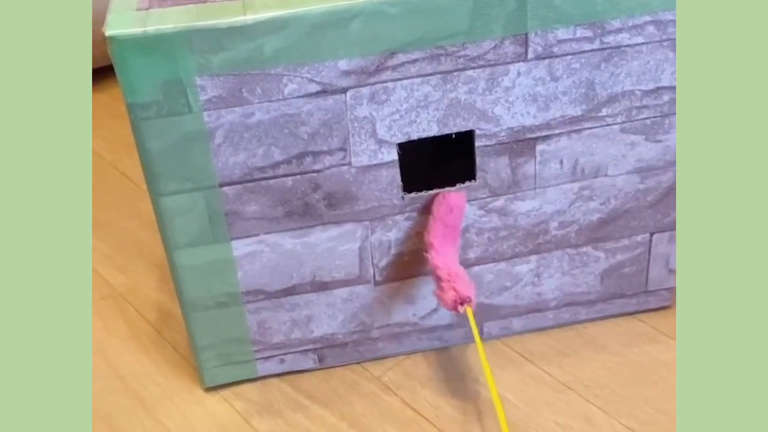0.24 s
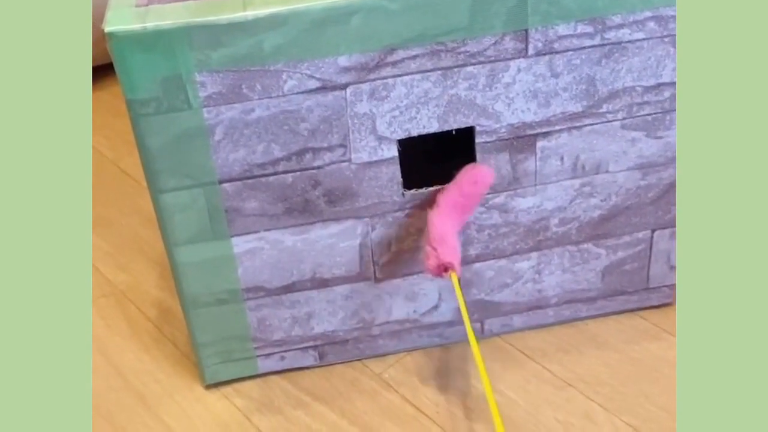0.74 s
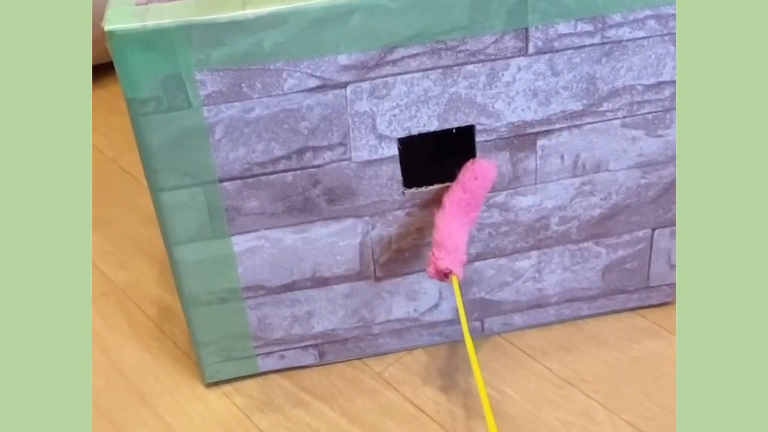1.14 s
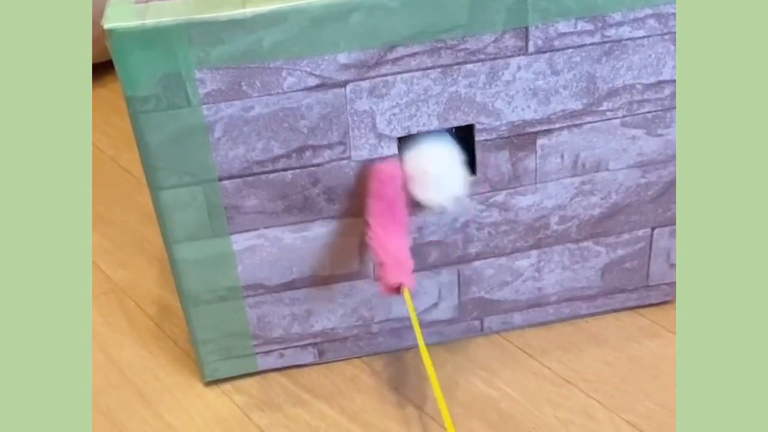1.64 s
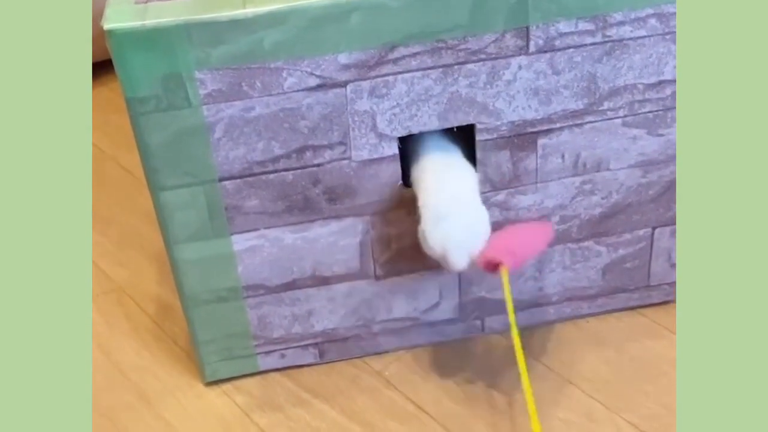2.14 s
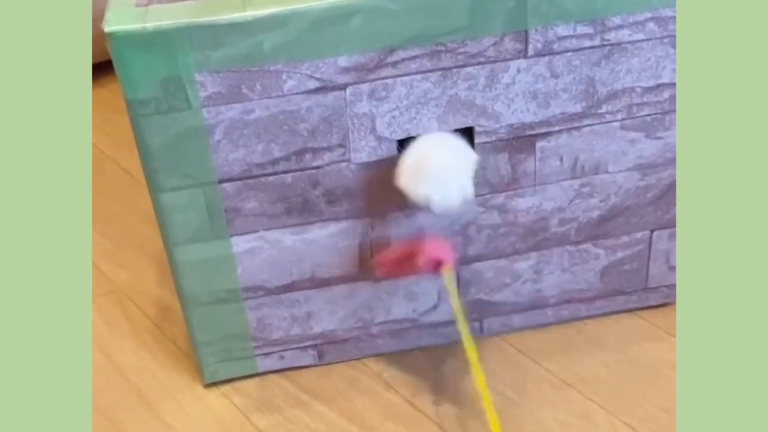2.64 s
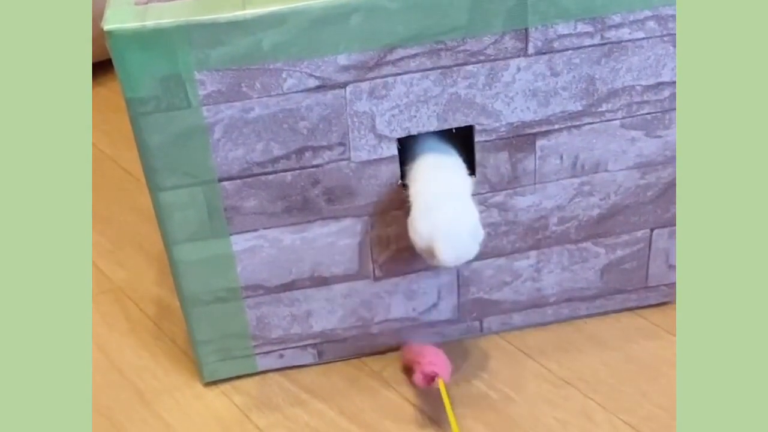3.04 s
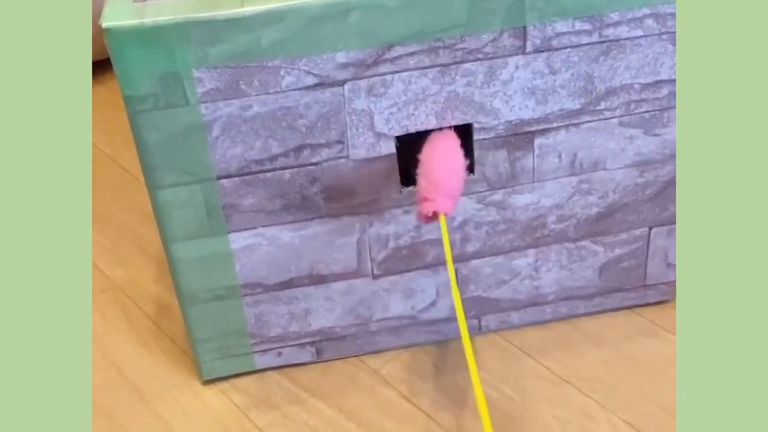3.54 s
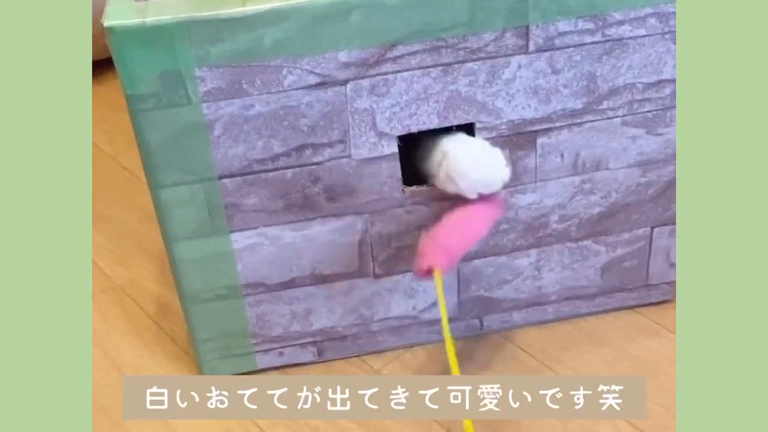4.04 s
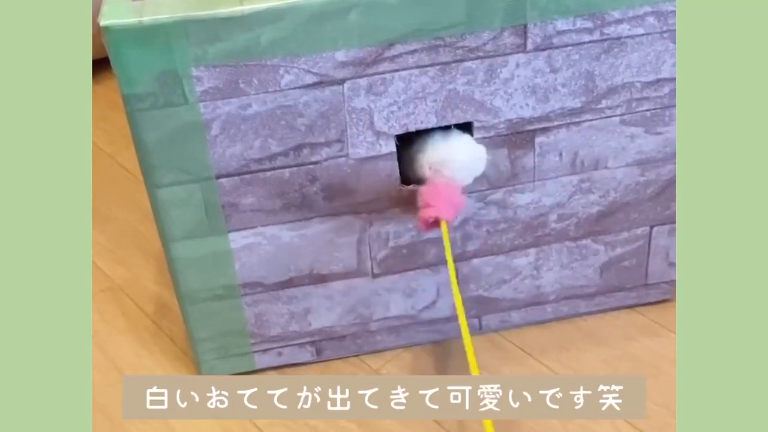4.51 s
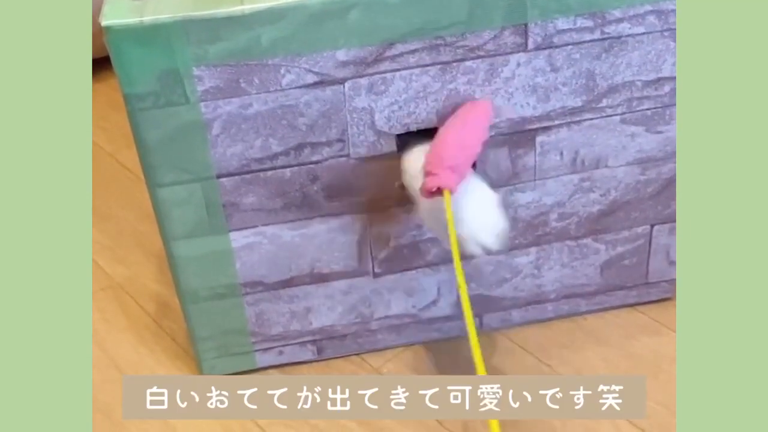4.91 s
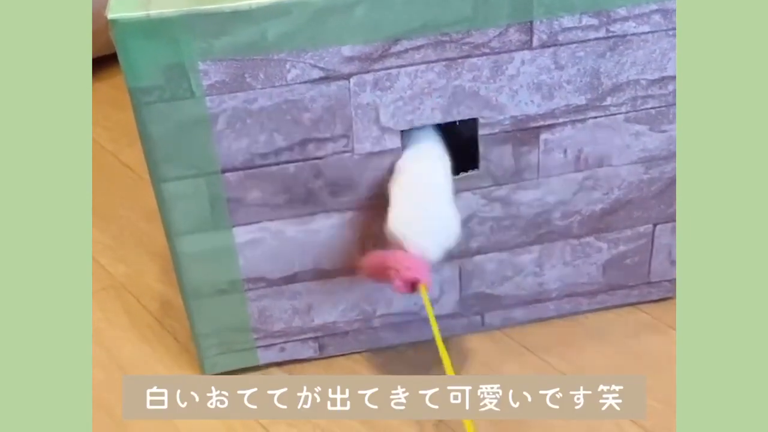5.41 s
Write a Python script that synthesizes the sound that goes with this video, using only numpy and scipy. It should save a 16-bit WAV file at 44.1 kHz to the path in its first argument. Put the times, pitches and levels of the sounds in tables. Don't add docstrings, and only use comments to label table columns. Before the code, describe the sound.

In a quiet room, a cat's paw thumps a hollow cardboard box in sudden bursts, with claw ticks, scrapes and short rasps over faint low hum.

```python
import sys
import numpy as np
from scipy import signal
from scipy.fft import rfft, irfft
from scipy.io import wavfile
from scipy.ndimage import uniform_filter1d

SR = 44100
rng = np.random.default_rng(int(sys.argv[2]) if len(sys.argv) > 2 else 0)


def makeup_ratio(level_db):
    decades = np.asarray(level_db, float) / 20
    return 10 ** decades


def digitize_waveform(pressure):
    field = np.atleast_2d(pressure).T
    bounded = np.clip(field, -1, 1)
    quanta = np.round(bounded * 32767).astype(np.int16)
    wavfile.write(sys.argv[1], SR, quanta)


N = 250047
HZ = np.arange(N // 2 + 1) * SR / N

# frequency in Hz, width in Hz, level in dB.
WALL_MODES = [(186, 32, -1.5), (281.5, 46.1, 0.5), (320, 37, 2), (346.7, 34, -1.5), (447, 19, -15),
              (163, 30, -14)]
# frequency in Hz, width in Hz, level in dB.
CAVITY_MODES = [(62.95, 13, -4), (82.6, 12, 4.5), (112, 46.3, -1)]
# frequency in Hz, width in Hz, level in dB.
BOARD_MODES = [(522, 160, 6.5), (790, 290, -6.5), (904, 43, 7), (1200, 350, 8.5), (1390, 71, 0),
               (1657, 220, -10.5), (1880, 320, -7), (2830, 460, -11.5)]


def unit(x):
    return x / np.sqrt(np.mean(x ** 2))


def colour(x, points):
    hz, db = np.transpose(points)
    gain_db = np.interp(np.log(HZ + 1), np.log(hz), db)
    return irfft(rfft(x) * makeup_ratio(gain_db), N)


def ring(x, modes):
    total = 0
    for k, (hz, width, db) in enumerate(modes):
        mode = signal.lfilter(*signal.iirpeak(hz, hz / width, SR), x)
        total = total + (-1) ** k * makeup_ratio(db) * mode
    return total


def walk(rate):
    k = int(SR / rate)
    held = np.repeat(rng.standard_normal(N // k + 1), k)
    return 1.6 * uniform_filter1d(uniform_filter1d(held, k), k)[:N]


def grains(rate, spread_db):
    when, sign, size = rng.random((3, N))
    size_db = spread_db * np.minimum(-np.log(1 - size), 4.6)
    return (when < rate / SR) * np.sign(sign - .5) * makeup_ratio(size_db)


def add(out, s, burst, db):
    i = int(s * SR)
    n = min(len(burst), N - i)
    out[i:i + n] += burst[:n] * makeup_ratio(db) / np.abs(burst).max()


def sag(hz, rise_s, t60_s, glide, glide_s):
    t = np.arange(SR // 4) / SR
    turns = hz * (t + glide * glide_s * (1 - np.exp(-t / glide_s)))
    rise = (1 - np.exp(-t / rise_s)) ** 2
    decay = np.exp(-np.log(1000) * t / t60_s)
    return -rise * decay * np.sin(2 * np.pi * turns)


def blows():
    # start in seconds, wall level in dB, wall pitch in Hz,
    # cavity level in dB, cavity pitch in Hz.
    paw_swats = [(1.542, -5.5, 260, -21.5, 120.4), (1.558, -15, 304, -28, 128),
                 (1.573, -18.5, 265, -37, 73.4), (1.602, -18, 183, -38, 116.5),
                 (1.643, -21.5, 189, -26, 92), (1.684, -25.5, 268, -41.5, 117),
                 (1.9418, -18, 210, -28, 114), (1.962, -18.5, 167.5, -20.5, 117.7),
                 (1.973, -24, 188, -24, 107.6), (1.986, -45, 171, -26, 98.4),
                 (2.016, -37, 167.5, -29.5, 58), (3.179, -23.5, 266, -31.5, 104),
                 (3.192, -40.5, 286, -41, 75.5), (3.305, -31.5, 326, -45, 116),
                 (4.006, -36.5, 229, -47, 69.3), (4.7265, -19, 278, -28, 101), (4.757, -18.5, 229, -48, 96),
                 (4.777, -13, 300.6, -31, 104.5), (4.841, -31, 287, -44, 109), (4.87, -31, 211, -38.5, 83),
                 (4.983, -14.5, 214.6, -26.5, 117), (5.072, -57, 168.6, -40, 100),
                 (5.407, -29, 203, -27.5, 83.6), (5.459, -25.5, 193, -34.5, 71.8)]
    # start in seconds, wall level in dB, cavity level in dB.
    light_bumps = [(1.658, -30.5, -35.5), (1.71, -32.5, -43), (2.098, -55, -44), (2.338, -43.5, -44.5),
                   (2.693, -50, -50), (2.865, -38, -65.5), (3.148, -46, -51), (3.339, -36.5, -72),
                   (3.505, -51.5, -53), (3.65, -51.5, -52), (2.472, -58, -57), (4.044, -42, -53.5),
                   (4.08, -50, -54), (4.119, -37, -45.5), (4.138, -37, -49), (4.192, -41, -46),
                   (4.542, -46.5, -72), (4.597, -61, -44), (4.822, -31.5, -44), (4.896, -33.5, -34),
                   (4.918, -36.5, -73), (5.017, -52, -37.5), (5.047, -51, -40), (5.108, -47, -39.5),
                   (5.154, -37, -48.5), (5.295, -45, -46), (5.316, -35, -61), (5.34, -40.5, -60),
                   (5.373, -55, -46), (5.493, -42.5, -47)]
    out, knock, shove = np.zeros((3, N))
    place = np.exp(0.17 * rng.standard_normal((len(light_bumps), 2)))
    bumps = [(s, wall_db, 241.7 * a, boom_db, 93.4 * b)
             for (s, wall_db, boom_db), (a, b) in zip(light_bumps, place)]
    for s, wall_db, wall_hz, boom_db, boom_hz in paw_swats + bumps:
        add(out, s + 0.0021, sag(wall_hz * 0.89, 0.003, 0.033, 0.18, 0.0068), wall_db - 3.0)
        add(out, s + 0.0056, sag(boom_hz, 0.0042, 0.12, 0.29, 0.0079), boom_db)
        add(knock, s, np.hanning(SR // 600), wall_db)
        add(shove, s + 0.007, np.hanning(SR // 150), boom_db)
    return out + makeup_ratio(2.5) * ring(knock, WALL_MODES) + makeup_ratio(10.5) * ring(shove, CAVITY_MODES)


def touches(rows, length, shape, firm, trim_db):
    # frequency in Hz, width in Hz, level in dB.
    crack_modes = [(1980, 250, 1.5), (2960, 640, -2)]
    out, t = np.zeros(N), np.arange(SR // 10) / SR
    body = signal.butter(3, [420, 1500], "band", fs=SR, output="sos")
    dull = signal.butter(3, 2200, fs=SR, output="sos")
    snap = signal.butter(2, [4200, 13500], "band", fs=SR, output="sos")
    noises = rng.standard_normal((len(rows), 3, len(t)))
    for (s, db, hz, crack_db, snap_db), noise in zip(rows, noises):
        touch = noise * shape(t / max(length, .0004))
        touch[0, SR // 1000] += firm * np.sqrt(np.sum(touch[0] ** 2))
        thud = ring(touch[0], [(hz, hz / 3, 0)]) + signal.sosfilt(body, touch[0]) / 2
        start, thud_db, bright_db = s - .001, db + trim_db[0], crack_db + trim_db[1]
        add(out, start, signal.sosfilt(dull, thud), thud_db)
        add(out, start, ring(ring(touch[1], crack_modes), crack_modes), bright_db)
        add(out, start, ring(touch[0], BOARD_MODES[:1]), thud_db - 10.0)
        add(out, start, ring(touch[2], [(3530, 2800, 0)]), bright_db - 9.5)
        add(out, start, signal.sosfilt(snap, touch[2]), snap_db + trim_db[2])
    return out


def ticks():
    # start in seconds, level in dB, board ring in Hz, crack in dB, treble snap in dB.
    claw_ticks = [(1.543, -16.5, 1290, -26, -66), (1.6, -27, 1410, -39, -43), (1.608, -26, 676, -62, -54.5),
                  (1.637, -28, 710, -42, -44.5), (1.648, -22, 670, -33, -44.5),
                  (1.685, -43, 1100, -47, -46), (1.704, -43, 746, -47, -75), (1.94, -30.5, 750, -76, -62),
                  (2.375, -58.5, 760, -77, -62.5), (2.864, -49.5, 1236, -60, -69),
                  (3.164, -50, 1302, -67, -83), (3.188, -52, 1055, -55, -59),
                  (3.31, -56.5, 696, -50.5, -58.5), (3.318, -42.5, 2110, -58, -65),
                  (3.427, -54.5, 1283, -60.5, -56.5), (4.115, -53.5, 1675, -60.5, -57),
                  (4.142, -53, 1012, -67.5, -72), (4.19, -51, 1806, -58, -58),
                  (4.757, -42.5, 850, -54, -49), (4.779, -37.5, 703, -49, -50.5),
                  (4.981, -43.5, 940, -53, -52.5), (5.043, -50, 1180, -49, -61),
                  (5.364, -46, 1140, -65, -77), (5.488, -49.5, 1228, -62, -56)]
    # start in seconds, level in dB, treble snap in dB.
    faint_tips = [(0.752, -77, -76), (1.88, -70.5, -58.5), (1.925, -51.5, -55.5), (1.959, -51, -55),
                  (2.108, -66, -60.5), (3.294, -62.5, -69), (3.453, -59, -65), (3.548, -63, -89),
                  (3.708, -64.5, -72), (4.078, -60, -77), (4.702, -63, -68), (4.722, -60, -60),
                  (4.839, -49.5, -64), (4.868, -52.5, -61), (4.158, -54.5, -61.5), (5.647, -78.5, -62.5)]
    tips = [(s, db, 1100, db - 8.5, snap_db) for s, db, snap_db in faint_tips]
    return touches(claw_ticks + tips, 0.0022, lambda u: u * np.exp(-1.4 * u), 0.76, (0.5, 1.5, 7.0))


def rasps():
    # start in seconds, length in seconds, level in dB, ring in Hz.
    rib_runs = [(1.557, 0.03, -35.5, 617), (1.667, 0.021, -41, 650), (1.687, 0.026, -47, 2950),
                (1.925, 0.011, -47, 895), (1.979, 0.018, -49, 1200), (2.223, 0.038, -61.5, 1390),
                (2.225, .045, -68, 3130), (2.243, 0.018, -67, 990), (2.291, 0.081, -67, 3040),
                (2.299, 0.058, -61.5, 1380), (2.345, 0.028, -58, 1400), (2.391, 0.011, -58, 930),
                (2.421, 0.021, -68, 1340), (2.451, 0.033, -68.5, 890), (2.852, 0.022, -63.5, 1224),
                (3.139, 0.057, -52.5, 1380), (3.129, 0.037, -64.5, 3070), (3.31, 0.028, -54, 3570),
                (3.323, .06, -65.5, 1700), (3.322, 0.1, -57, 603), (3.385, .015, -61, 1010),
                (3.442, 0.025, -61.5, 1800), (3.971, 0.027, -56, 965), (4.005, 0.037, -58, 1500),
                (4.026, 0.034, -63.5, 2650), (4.079, 0.0065, -59, 1570), (4.112, .014, -53, 1750),
                (4.153, 0.014, -55, 2360), (4.633, 0.013, -55.5, 1200), (4.763, 0.031, -45, 2130),
                (4.882, 0.017, -48, 1980), (4.896, 0.018, -53, 2870), (4.908, .016, -44, 1470),
                (5.036, 0.017, -51, 2090), (5.042, .015, -42, 1200), (5.157, 0.021, -49, 1270),
                (5.321, 0.027, -50, 1100), (5.324, 0.022, -56, 1920), (5.36, 0.035, -46, 1200),
                (5.411, 0.013, -53, 2160), (5.411, 0.024, -52, 4620), (1.543, .012, -26, 626),
                (1.939, .008, -32, 790), (3.721, 0.09, -67.5, 637), (3.798, 0.041, -70.5, 900),
                (3.855, 0.037, -67, 790), (3.932, 0.041, -67, 847), (4.55, .045, -64.5, 958),
                (4.775, 0.012, -37.5, 744), (1.779, 0.0077, -55.5, 1200)]
    rate_hz, q = 1500, 2.8
    out, t = np.zeros(N), np.arange(SR // 8) / SR
    for (s, length, db, hz), (when, size) in zip(rib_runs, rng.random((len(rib_runs), 2, len(t)))):
        slips = (when < rate_hz / SR) * (size - .5) + 0.021 * (size - .5)
        spot = [(hz, hz / q, 0)]
        press = np.sin(np.pi * np.clip(t / max(length, .004), 0, 1) ** 0.7) ** 1.4
        add(out, s - .002, ring(ring(slips * press, spot), spot), db)
    return out


def strokes():
    # start in seconds, level in dB, board ring in Hz, crack in dB, treble in dB.
    pad_strokes = [(0.682, -71, 1120, -82, -84), (2.225, -57, 970, -81, -78),
                   (2.334, -64.5, 1323, -75, -83.5), (2.594, -56.5, 898, -67, -70.5),
                   (2.694, -59.5, 1110, -73.5, -78), (3.134, -66, 1353, -68, -75),
                   (3.15, -58, 1304, -65, -81.5), (3.544, -64, 1457, -70, -86.5),
                   (3.976, -58, 830, -67.5, -73.5), (4.541, -57, 928, -71.5, -71.5),
                   (4.637, -61.5, 1300, -72, -71), (4.75, -51, 853, -54.5, -54),
                   (4.89, -47, 1290, -53, -55), (5.03, -61, 1200, -56, -55), (5.152, -48, 1270, -57.5, -57),
                   (5.302, -63, 1067, -58, -68), (5.398, -45, 1200, -57.5, -62)]
    soft = lambda u: np.sin(np.pi * np.clip(u, 0, 1) ** 0.67) ** 0.58
    return touches(pad_strokes, 0.033, soft, 0, (-2.0, 3.0, 9.0))


def pressure(starts, lengths, levels_db, rest_db, rise_db_s=1197):
    sag_db, lift_db_s = 10, 694
    t = np.arange(0, N + 64, 64) / SR
    u = t - np.array(starts)[:, None]
    n = np.clip(lengths, .005, 1)[:, None]
    fall = rise_db_s * np.maximum(-u, 0) + sag_db * np.clip(u / n, 0, 1) + lift_db_s * np.maximum(u - n, 0)
    power = (makeup_ratio(np.array(levels_db)[:, None] - fall) ** 2).sum(0) + makeup_ratio(rest_db) ** 2
    return np.interp(np.arange(N) / SR, t, np.sqrt(power))


def moves():
    # start in seconds,
    # length in seconds, scrape in dB, fur in dB.
    claw_drags = [(5.057, 0.085, -57, -75.5), (3.636, 0.26, -81, -86.5), (0.668, 0.12, -75, -92.5),
                  (1.788, 0.12, -60.5, -78.5), (1.545, 0.096, -39, -69.5), (1.656, 0.033, -44, -61.5),
                  (1.676, 0.096, -45.5, -91), (1.915, 0.034, -52, -72.5), (1.96, 0.083, -45.5, -63),
                  (2.06, 0.41, -65.5, -85), (2.22, 0.081, -59, -82), (2.317, 0.15, -61, -80.5),
                  (2.587, 0.027, -60.5, -82), (2.691, 0.063, -62.5, -76), (2.86, 0.016, -52, -85),
                  (3.146, 0.072, -52, -75), (3.306, 0.17, -54.5, -79), (3.546, 0.07, -85, -90),
                  (4.716, 0.084, -55, -78), (3.868, 0.045, -65.5, -80.5), (3.996, 0.11, -54, -71.5),
                  (4.108, 0.14, -58.5, -79.5), (4.536, 0.2, -59, -75.5), (4.759, 0.04, -40, -64),
                  (4.885, 0.046, -42.5, -63.5), (5.037, 0.038, -43.5, -64), (5.155, 0.043, -44.5, -71),
                  (5.19, 0.13, -57, -73.5), (4.935, 0.25, -57.5, -77), (5.288, 0.17, -52, -71.5),
                  (5.34, 0.16, -49.5, -71.5), (5.648, 0.047, -63.5, -86.5),
                  (.12, 0.18, -95, -92),
        (0.475, 0.045, -77, -95),
        (1.287, 0.11, -77, -102),
        (2.443, 0.056, -67, -81),
        (3.776, 0.35, -74.5, -100),
        (4.294, 0.086, -88, -99),
    ]
    # start in seconds, length in seconds, level in dB.
    weight_shifts = [(0.179, 0.1, -65.5), (0.475, 0.027, -70.5), (0.698, 0.056, -66), (1.556, 0.062, -56),
                     (1.722, .12, -48.5), (1.944, 0.13, -35.5), (2.063, 0.2, -63.5), (2.2, 0.37, -64.5),
                     (2.595, 0.32, -63.5), (2.854, 0.25, -67.5), (3.176, 0.061, -43), (3.3, 0.16, -47.5),
                     (3.465, 0.19, -66.5), (3.686, 0.28, -62), (3.872, 0.082, -61.5), (3.981, 0.23, -56.5),
                     (4.096, 0.15, -49.5), (4.329, 0.12, -72.5), (4.575, 0.25, -59), (4.677, 0.17, -70),
                     (4.907, 0.046, -46), (5.02, 0.066, -41.5), (5.165, 0.081, -53.5), (5.298, 0.21, -43.5),
                     (5.436, 0.15, -69.5)]
    # weight in dB, scrape in dB, fur in dB.
    still_db = (-86.5, -93.5, -108)
    # frequency in Hz, density in dB per Hz.
    fur_tint = [(1500, -25.5), (3000, -30.5), (5000, -5), (7500, -0.5), (10500, -0.5), (13000, 1.5),
                (15500, -7.5)]
    s, length, scrape_db, fur_db = np.transpose(claw_drags)
    weight = unit(ring(grains(330, 2.6), WALL_MODES + CAVITY_MODES))
    weight = weight * pressure(*np.transpose(weight_shifts), still_db[0])
    stutter = makeup_ratio(3 * walk(70))
    slips = unit(grains(2500, 2.9)) + 0.55 * rng.standard_normal(N)
    scrape = unit(sum(makeup_ratio(5 * walk(11)) * ring(slips * stutter, [mode]) for mode in BOARD_MODES))
    scrape = scrape * makeup_ratio(-8.5) * pressure(s, length, scrape_db, still_db[1])
    hairs = rng.standard_normal(N) + 0.81 * unit(grains(1200, 7.0))
    fur = unit(colour(hairs * makeup_ratio(1.4 * walk(40)), fur_tint))
    fur = fur * makeup_ratio(8.0) * pressure(s, length, fur_db, still_db[2], rise_db_s=502)
    return weight + scrape + fur


def swish():
    # time in seconds, frequency in Hz, level in dB.
    toy_path = [
        (.56, 1450, -90),
        (.61, 1430, -80),
        (.67, 1400, -77.5),
        (0.711, 1142, -66),
        (.78, 1009, -93),
    ]
    s, hz, db = np.transpose(toy_path)
    t = np.arange(N) / SR
    flutter = unit(uniform_filter1d(uniform_filter1d(rng.standard_normal(N), SR // 700), SR // 700))
    level = makeup_ratio(np.interp(t, s, db, -150, -150))
    return level * flutter * np.sin(2 * np.pi * np.cumsum(np.interp(t, s, hz)) / SR)


def tail(t60_s):
    t = np.arange(int(t60_s * SR)) / SR
    h = rng.standard_normal(len(t)) * np.exp(-np.log(1000) * t / t60_s)
    return h / np.sqrt(np.sum(h ** 2))


def scatter(x, t60_s):
    h = rfft(tail(t60_s), N)
    return irfft(rfft(x) * h / np.abs(h), N)


def ports(direct, diffuse, spill_db, share, stretch):
    # frequency in Hz, lead in half turns.
    port_turn = [(0, 0), (4400, 0), (5300, 0), (6300, .85), (6600, .97), (8100, 1.03), (8500, 1.2),
                 (9600, 1.95), (11300, 2.05), (12300, 2.8), (12800, 2.97), (14200, 3.03), (14700, 3.25),
                 (15700, 4)]
    # frequency in Hz, level in dB.
    side_spill = [(60, -55.5), (130, -28), (300, -10.5), (700, -6), (1300, -9.5), (1800, -18.5), (2400, -8),
                  (4200, -8), (5100, -17.5), (6000, -19.5), (8000, -40.5)]
    half = np.interp(HZ * stretch, *np.transpose(port_turn)) * np.pi / 2
    share = np.clip(share, 0, 1)
    mid = irfft(rfft(direct) * np.cos(half), N)
    blend = np.sqrt(share) * direct + np.sqrt(1 - share) * diffuse
    side = irfft(rfft(blend) * 1j * np.sin(half), N)
    side = side + makeup_ratio(spill_db) * colour(diffuse, side_spill)
    return np.array([mid + side, mid - side])


def heard(x, near, stretch):
    parts = (near * x, 1 / stretch), ((1 - near) * x, stretch)
    return sum(ports(v, scatter(v, 0.009), -1.5, .45, k) for v, k in parts)


def hum():
    # frequency in Hz, level in dB rms.
    motor_lines = [(49.7, -56.5), (126.9, -66), (250, -101)]
    t = np.arange(N) / SR
    return sum(np.sqrt(2) * makeup_ratio(db + 0.8 * walk(30)) * np.sin(2 * np.pi * hz * t) for hz, db in motor_lines)


def air():
    # frequency in Hz, density in dB per Hz.
    room_tint = [(30, -10.5), (55, -1.5), (85, -0.5), (135, -2), (170, -17.5), (300, -23.5), (600, -32.5),
                 (1200, -36.5), (2000, -40), (5000, -46), (9000, -49), (12000, -48.5), (15500, -55.5)]
    return unit(colour(rng.standard_normal(N), room_tint)) * makeup_ratio(-65)


def scene():
    room = tail(0.34)

    def wet(x, db):
        return x + makeup_ratio(db) * signal.fftconvolve(x, room)[:N]

    thump = wet(blows(), -13)
    rub = wet(moves() + strokes() + swish(), -11)
    claw = wet(ticks() + rasps(), -12.5)
    near = np.clip(.5 + 2.9 * walk(3.8), 0, 1)
    box = ports(thump, scatter(thump, 0.013), -12.0, 0.36, 0.995)
    box = box + heard(rub, near, 0.96) + heard(claw, near, 1.1)
    return box + ports(air(), air(), 13.0, 0.33, 0.913) + hum()


def low_pass(x):
    return signal.sosfilt(signal.butter(12, 16260, fs=SR, output="sos"), x)


def record(dry):
    bass_cut = signal.butter(3, 38, "high", fs=SR, output="sos")
    top_cut = signal.ellip(8, .2, 70, 15500, fs=SR, output="sos")
    mix = signal.sosfilt(top_cut, signal.sosfilt(bass_cut, dry))
    return low_pass(mix)


dry = scene()
out = record(dry)
digitize_waveform(out)
```